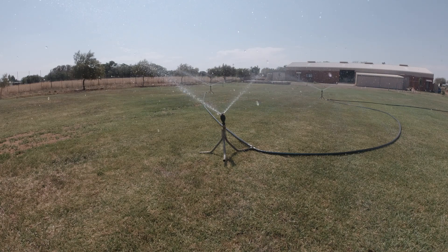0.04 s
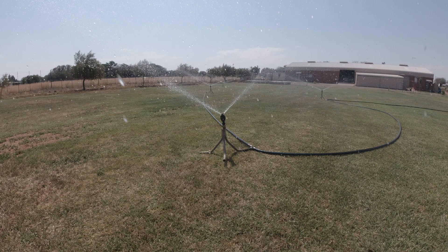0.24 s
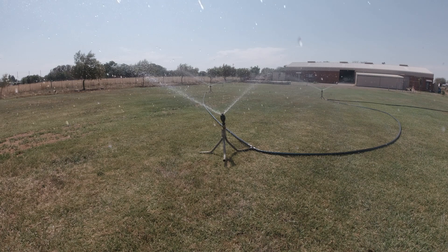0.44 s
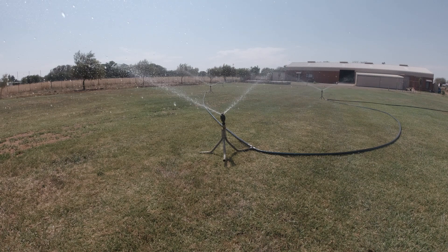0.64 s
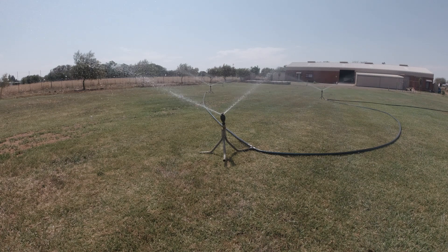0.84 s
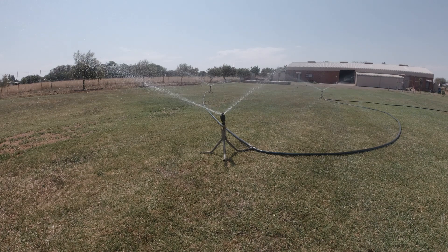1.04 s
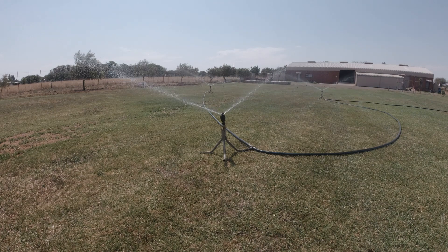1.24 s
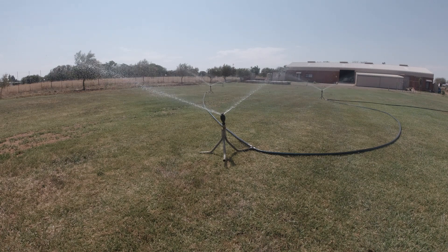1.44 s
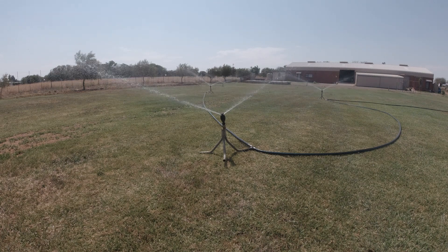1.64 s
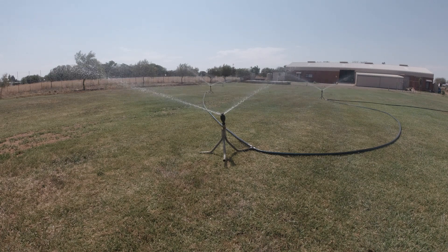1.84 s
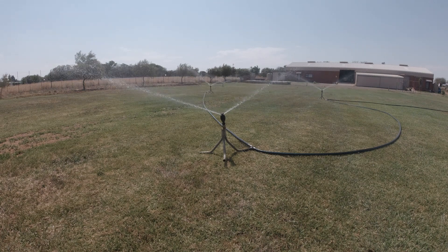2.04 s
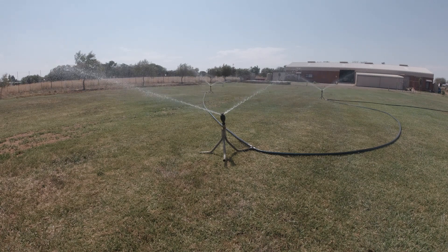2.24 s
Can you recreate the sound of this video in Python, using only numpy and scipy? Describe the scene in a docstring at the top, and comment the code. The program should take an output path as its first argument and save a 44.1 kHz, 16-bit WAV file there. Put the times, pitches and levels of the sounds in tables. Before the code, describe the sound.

A lawn sprinkler a few metres away hisses faintly throughout. From 0 to 0.65 s, drops tick crisply on the camera case, the hardest with hollow knocks near 0.17, 0.45 and 0.6 s, amid fine patter, fizz and low fluttering wind. It calms around 0.75 s; then the arm ticks fast and faint, about sixteen times a second, to the end. Wind buffets again from 1.2 s, easing after 1.9 s.

```python
"""A lawn sprinkler a few metres from a small camera in gusty wind; its jets hiss faintly all the way through.
First the edge of the jet sweeps over: drops tick on the plastic case and ring its hollow body, fine spray
patters and fizzes, and wind buffets both microphone ports. Then the spray moves on and the air calms.
From about 0.8 s the spring arm ticks quickly and faintly, and from about 1.2 s the wind gusts again.
Drops and arm are fading tones with noise, jets and spray are mostly shaped noise, wind is noise and low pulses."""
import sys
import numpy as np
from scipy import signal
from scipy.io import wavfile
from scipy.ndimage import uniform_filter1d, map_coordinates

SR = 44100
rng = np.random.default_rng(int(sys.argv[2]) if len(sys.argv) > 2 else 0)


def store_wav(level_fs):
    """Save 16-bit WAV to argv[1]."""
    pcm = np.round(np.clip(np.atleast_2d(level_fs), -1, 1) * 32767)
    wavfile.write(sys.argv[1], SR, pcm.T.astype(np.int16))


def linear_from_db(decibels):
    """Turn decibels (scalar or array-like) into linear amplitude factors; 0 gives 1."""
    return 10 ** (np.asarray(decibels, float) / 20)


N = 101429  # length in samples
LEFT_RIGHT = np.array([[1], [-1]])

# wind at the ports: (t/s, buffet level/dB, flutter level/dB, air speed/ratio to the mean), before trims
WIND_COURSE = [(0.0, -38, -89, 1.6), (0.02, -42, -71, 0.61), (0.14, -37.5, -55, 3.9), (0.16, -28.5, -52, 5),
               (0.22, -28, -49, 2.1), (0.24, -31, -31, 1.08), (0.3, -21, -27, 1.77),
               (0.34, -27, -33.5, 1.67), (0.4, -23, -23.5, 2), (0.43, -28.5, -40.5, 1.4),
               (0.49, -26, -32.5, 1.53), (0.5, -18.5, -46, 1.6), (0.52, -23, -33, 1.24),
               (0.57, -35, -58, 3.3), (0.61, -34.5, -55, 0.75), (0.67, -29, -40, 1.12),
               (0.695, -30.5, -42.5, 0.99), (0.76, -40.5, -64, 1.25), (0.82, -45, -50, 0.81),
               (0.86, -35, -63, 0.9), (0.88, -43.5, -76, 1.1), (1.0, -38.5, -55, 1.05),
               (1.04, -37.5, -56, 0.99), (1.06, -41, -66, 1.22), (1.16, -33.5, -35, 0.86),
               (1.18, -45, -34, 0.91), (1.21, -26.5, -34, 1.06), (1.23, -37, -21.5, 0.82),
               (1.3, -31, -27, 0.91), (1.34, -30.5, -24, 0.98), (1.38, -21.5, -33, 0.78),
               (1.45, -37.5, -26, 0.92), (1.5, -48, -41.5, 0.93), (1.52, -38, -33, 0.62),
               (1.6, -42, -44, 1.35), (1.64, -38, -36.5, 1.45), (1.67, -39, -35.5, 1.9),
               (1.71, -34, -26, 1.2), (1.75, -24.5, -34, 1.16), (1.78, -39, -38, 0.54),
               (1.81, -34, -35.5, 0.55), (1.86, -38, -38.5, 1.19), (1.9, -29, -35, 1.05),
               (1.94, -56.5, -33.5, 0.91), (2.26, -36, -48.5, 0.68), (2.3, -44, -45.5, 0.97)]
# how alike the wind is at the left and right ports: (f/Hz, likeness from -1 to 1)
WIND_LIKENESS = [(30, -0.062), (80, -0.25), (200, 0.32), (320, -0.036), (700, 0.49), (1500, 0.48)]
# fine spray on the case and at the ports: (t/s, patter level/dB, fizz level/dB), before trims
SPRAY_COURSE = [(0.0, -55, -60), (0.03, -62, -89), (0.054, -58, -92), (0.06, -65.5, -71), (0.146, -60, -69),
                (0.164, -61, -96), (0.172, -66, -76), (0.24, -60.5, -68), (0.352, -60, -88),
                (0.386, -50.5, -69), (0.436, -61, -60), (0.446, -48, -55), (0.498, -67, -64),
                (0.518, -57, -54), (0.526, -55.5, -62), (0.628, -58, -62.5), (0.658, -72, -70),
                (0.846, -75.5, -87), (0.854, -81, -77), (0.9, -74.5, -91)]


def unit(x):
    """Scale to rms 1."""
    return x / np.sqrt(np.mean(x ** 2) + 1e-20)


def along(points, hz):
    """Read (frequency, value) points on a log axis."""
    f, v = np.transpose(points)
    return np.interp(np.log(hz + 1), np.log(f + 1), v)


def curves(rows, t):
    """Read each column after the time, at times t."""
    s, *cols = np.transpose(rows)
    return [np.interp(t, s, c) for c in cols]


def wobble(rate):
    """A smooth random curve with this many random points a second."""
    return map_coordinates(rng.standard_normal(500), [np.arange(N) * rate / SR])


def lumps(depth_db, rate):
    """Quick swells of gain, partly shared by the two ports."""
    shared = wobble(rate)
    return unit(linear_from_db(depth_db * np.array([0.4 * shared + 0.6 * wobble(rate) for _ in "LR"])))


def band(x, lo_hz, hi_hz):
    """Keep a band of frequencies, with steep edges."""
    return signal.sosfilt(signal.butter(3, [lo_hz, hi_hz], "band", fs=SR, output="sos"), x)


def rush(spectrum, alike, patchy_db, moving_db=lambda hz, t: 0):
    """Stereo noise with patches of random gain, about rms 1 before the patches and the moving gain."""
    hz, t, z = signal.stft(rng.standard_normal((2, N + 2048)), SR, nperseg=1024, noverlap=768)
    hz = hz[:, None]
    field = uniform_filter1d(rng.standard_normal(z.shape[1:]), size=5, axis=0)
    field = uniform_filter1d(field, size=6, axis=1)
    inside = (hz > spectrum[0][0]) & (hz < spectrum[-1][0])
    shape = np.where(inside, linear_from_db(along(spectrum, hz)), 0)
    gain = shape / np.sqrt(np.mean(shape ** 2)) * linear_from_db(patchy_db * unit(field) + moving_db(hz, t))
    # more side against mid makes the two ports less alike
    turn = np.arccos(np.clip(along(alike, hz), -1, 1)) / 2
    mid, side = z[0] * np.cos(turn) * gain, z[1] * np.sin(turn) * gain
    return signal.istft(np.array([mid + side, mid - side]), SR, nperseg=1024, noverlap=768)[1][:, :N]


def add(out, s, sound):
    """Mix a sound in at time s."""
    i = round(s * SR)
    out[:, i:i + sound.shape[-1]] += sound[..., :N - i]


def ring(modes, t, scatter_db):
    """One blow on a set of modes: fading sine tones, each struck a little harder or softer by chance."""
    total = 0
    for hz, db, t60 in modes:
        level_db = db + scatter_db * rng.standard_normal()
        total = total + linear_from_db(level_db - 60 * t / t60) * np.sin(2 * np.pi * hz * t)
    return total


def swell(t, peak_s):
    """A smooth pulse that reaches 1 at peak_s and then dies away."""
    return (t / peak_s * np.exp(1 - t / peak_s)) ** 2


def jet_hiss():
    """The far jets hiss steadily: shaped noise with a slight waver."""
    # spectrum of the jets: (f/Hz, level/dB per Hz), relative
    jet_spectrum = [(290, -32.5), (500, -8.5), (720, -14), (1200, -17), (1470, -19), (2880, -25),
                    (6060, -30.5), (7220, -38.5), (8850, -25.5), (12700, -34), (14300, -28), (15600, -35.5),
                    (16300, -45.5)]
    # left-right likeness: (f/Hz, likeness from -1 to 1)
    jet_likeness = [(1000, 0.12), (4400, 0.047), (8000, 0.73), (15000, 0.64)]
    level_db = -66.5
    return linear_from_db(level_db + 0.9 * wobble(35)) * rush(jet_spectrum, jet_likeness, 0.58)


def spring_arm():
    """The arm ticks against the stream: each strike rings its modes and adds a crack of noise."""
    # strikes: (t/s, peak level/dB before trim)
    strikes = [(0.7887, -54.5), (0.856, -52), (0.9186, -54.5), (0.9897, -55), (1.048, -54.5), (1.1065, -56),
               (1.1694, -60), (1.224, -55), (1.29, -79), (1.354, -49), (1.3957, -62), (1.4375, -54),
               (1.504, -49), (1.525, -61), (1.5678, -51), (1.6227, -64), (1.684, -54), (1.738, -57),
               (1.7975, -55), (1.829, -57.5), (1.851, -54.5), (1.9106, -56), (1.9694, -65), (2.024, -56),
               (2.045, -50.5), (2.057, -61), (2.139, -56.5), (2.177, -60), (2.198, -59), (2.2553, -56)]
    # modes of the arm: (f/Hz, level/dB relative, time to fall 60 dB/s)
    arm_modes = [(2180, 1.5, 0.011), (2900, -6, 0.021), (4010, -4.5, 0.009), (5000, -4.5, 0.0073),
                 (8980, -6.5, 0.012)]
    crack_gain, trim_db = 2.5, -2.5
    out, t = np.zeros((2, N)), np.arange(SR // 20) / SR
    for s, db in strikes:
        noise = band(rng.standard_normal(len(t)), 1300, 6000)
        crack = crack_gain * linear_from_db(-60 * t / 0.0042) * noise
        blow = (ring(arm_modes, t, 4) + crack) * (1 - np.exp(-t / 0.0005))
        add(out, s, linear_from_db(db + trim_db) * blow[None] / abs(blow).max())
    return out


def whistles():
    """Thin wavering tones with soft ends, each a very narrow band of noise."""
    # whistles: (t/s, length/s, f/Hz, level/dB before the soft ends)
    thin_tones = [(.645, .035, 4950, -77), (.755, .085, 2900, -75), (1.89, .14, 2880, -79)]
    out = np.zeros((2, N))
    for s, length, hz, db in thin_tones:
        t = np.arange(round(length * SR)) / SR
        # take the end of the noise, where the filter has settled
        tone = unit(band(rng.standard_normal(SR // 4), hz - 60, hz + 60)[-len(t):])
        add(out, s, linear_from_db(db) * np.sqrt(np.sin(np.pi * t / length)) * tone[None])
    return out


def wind_buffet():
    """Slow wind pressure at the ports: low noise that follows the gusts."""
    # spectrum of the buffet: (f/Hz, level/dB per Hz), relative
    buffet_spectrum = [(15, -10), (30, 6), (60, -5), (120, -6), (200, -13), (400, -29), (700, -77)]
    low_noise = rush(buffet_spectrum, WIND_LIKENESS, 2.9, lambda hz, t: curves(WIND_COURSE, t)[0] + 0.77)
    return low_noise * lumps(2.5, 25)


def wind_eddies():
    """Eddies flutter at the ports: noise whose centre rises in pitch with the air speed."""
    # flutter spectrum: (f/ratio to the centre, level/dB relative)
    flutter_shape = [(.2, -15.5), (.5, 5.5), (1.05, -1.5), (1.8, -8), (3, -23.5), (4.5, -39.5), (6.5, -55),
                     (9, -68), (16, -100)]
    centre_hz = 305  # at mean air speed

    def eddies_db(hz, t):
        _, level_db, speed = curves(WIND_COURSE, t)
        ratio = hz / (centre_hz * np.clip(speed, 0.3, 4))
        # ratios are read as per cent, to suit the log axis
        shape_db = along([(100 * r, db) for r, db in flutter_shape], 100 * ratio)
        return level_db + shape_db - 10 * np.log10(np.mean(linear_from_db(2 * shape_db), 0))

    return rush([(10, 0), (SR / 2, 0)], WIND_LIKENESS, 2.17, eddies_db) * lumps(4, 70)


def wind_flaps():
    """The sharpest flaps of air: short low pulses with some rasp and a drifting phase at each port."""
    # flaps: (t/s, level/dB before trim, f/Hz before drift, rasp level/dB relative to the tone's peak)
    flaps = [(0.271, -26, 290, -15), (0.292, -16.5, 520, -17), (0.315, -16.5, 390, -10.5),
             (0.349, -15.5, 385, -20), (0.377, -21.5, 347, -7), (0.393, -14, 507, -18),
             (0.398, -10.5, 325, -18), (0.479, -21, 700, -25), (0.511, -32, 358, -13),
             (0.672, -27, 536, -28), (1.227, -20, 373, -38), (1.237, -20, 490, -41),
             (1.289, -20.5, 360, -36), (1.326, -12, 350, -38), (1.33, -20.5, 590, -33),
             (1.387, -25, 393, -38), (1.443, -15, 279, -31), (1.619, -27.5, 496, -20),
             (1.669, -19.5, 610, -40), (1.686, -21.5, 480, -23), (1.713, -15, 260, -39),
             (1.732, -18.5, 242, -34), (1.878, -25, 450, -24), (1.97, -19.5, 283, -35),
             (2.038, -29.5, 378, -32.5)]
    cycles_to_peak, trim_db = 1.06, -5.5
    out, t = np.zeros((2, N)), np.arange(SR // 20) / SR
    for s, db, hz, rasp_db in flaps:
        drift = 0.52 * rng.standard_normal((2, 1)) + 150 * t * rng.standard_normal((2, 1))
        rasp = linear_from_db(rasp_db) * unit(band(rng.standard_normal((2, len(t))), 800, 1660))
        tone = np.sin(2 * np.pi * hz * t + drift)
        add(out, s, linear_from_db(db + trim_db) * swell(t, cycles_to_peak / hz) * (tone + rasp))
    return out


def wind_shoves():
    """The heaviest low shoves: a push and rebound of pressure, reaching each port in its own phase."""
    # shoves: (t/s, level/dB, f/Hz, left over right/dB)
    air_shoves = [(0.138, -21.5, 78.5, 6), (0.189, -16, 44.5, 1), (0.274, -17.5, 184, 3),
                  (0.28, -20, 195, 0), (0.306, -19, 210, 2), (0.33, -20.5, 147, 3), (0.362, -20, 160, 0),
                  (0.369, -24.5, 187, -9), (0.412, -38, 89, 9), (0.461, -31, 44.8, 0.5),
                  (0.54, -25.5, 61, -7), (0.64, -27.5, 183, -6), (0.656, -23, 43, 3),
                  (0.665, -21.5, 193, -1), (0.672, -23, 240, 3), (0.674, -27, 50.4, -7),
                  (0.7, -27.5, 46.6, 2), (1.283, -17.5, 89, 0), (1.314, -13.5, 67, 1.5),
                  (1.358, -23, 58.7, -2), (1.398, -19, 135, 2), (1.709, -25, 63.6, 3),
                  (1.738, -24.5, 207, 14)]
    cycles_to_peak = 0.43
    out, t = np.zeros((2, N)), np.arange(SR // 8) / SR
    for s, db, hz, pan_db in air_shoves:
        wave = np.sin(2 * np.pi * hz * t + 0.79 * rng.standard_normal((2, 1)))
        add(out, s, linear_from_db(db + pan_db / 2 * LEFT_RIGHT) * swell(t, cycles_to_peak / hz) * wave)
    return out


def narrow_fizz():
    """Early spray fizz at the port resonance: wavering noise in a narrow band."""
    # course of the narrow fizz: (t/s, level/dB before the waver)
    narrow_fizz_course = [(0.17, -95), (0.185, -70), (0.25, -64.5), (0.32, -79), (0.4, -69), (0.44, -95)]
    # its spectrum: (f/Hz, level/dB per Hz), relative
    narrow_fizz_spectrum = [(8300, -17), (8900, -1.5), (9300, -4), (9700, -20)]
    narrow_fizz_db, = curves(narrow_fizz_course, np.arange(N) / SR)
    return linear_from_db(narrow_fizz_db + 3.6 * wobble(100)) * rush(narrow_fizz_spectrum, [(9000, 0.28)], 1.5)


def spray_levels():
    """Patter and fizz levels, faded far down by 1.05 s."""
    return curves(SPRAY_COURSE + [(1.05, -100, -100)], np.arange(N) / SR)


def spray_fizz():
    """Fine spray fizzes at the ports while the jet's edge is near: wavering treble noise."""
    # spectrum of the fizz: (f/Hz, level/dB per Hz), relative
    fizz_spectrum = [(6500, -20), (8200, -9), (9200, -1), (10000, -8), (11000, -7), (12500, -30)]
    fizz_db = spray_levels()[1]
    return linear_from_db(fizz_db - 7.0 + 0.88 * wobble(60)) * rush(fizz_spectrum, [(9000, 0.32)], 2)


def spray_patter():
    """Fine droplets patter on the case: many tiny fading tones of random time, pitch, size and side."""
    per_s, middle_hz, pitch_spread, size_db, trim_db = 2800, 2620, 0.41, 2.5, 3
    draw = rng.random((5000, 4))
    start = np.cumsum(-np.log(draw[:, 0])) / per_s
    draw, start = draw[start < 1.05], start[start < 1.05]
    hz = middle_hz * np.exp(pitch_spread * np.log(draw[:, 1:2] / (1 - draw[:, 1:2])) / 1.57)
    t = np.arange(200) / SR
    # each tone falls 60 dB in 10 cycles
    level_db = -size_db * np.log(draw[:, 2:3] + 0.011) - 60 * t * hz / 10.0
    rise = 1 - np.exp(-t / 0.00025)
    grain = linear_from_db(level_db) * rise * np.sin(2 * np.pi * np.minimum(hz, 9000) * t)
    where = (start[:, None] * SR).astype(int) + np.arange(200)
    side = np.pi * (draw[:, 3:4] - 0.25)
    pair = np.array([np.bincount(where.ravel(), (grain * g).ravel(), N) for g in (np.cos(side), np.sin(side))])
    even = pair / np.sqrt(np.mean(pair[:, :SR] ** 2))  # rms 1 over the first second
    return even * linear_from_db(spray_levels()[0] + trim_db)


def drop_thuds():
    """Heavy drops ring the hollow body: its modes sound with a soft start."""
    # heavy drops: (t/s, level/dB before trim)
    heavy_drops = [(0.096, -38), (0.132, -44), (0.146, -34.5), (0.169, -19), (0.252, -32), (0.4498, -20),
                   (0.48, -35.5), (0.523, -41), (0.552, -38.5), (0.582, -26), (0.602, -36), (0.615, -41)]
    # modes of the body: (f/Hz, level/dB relative, time to fall 60 dB/s)
    body_modes = [(929, -1, 0.045), (843, -29, 0.034), (1490, 2.5, 0.0051)]
    out, t = np.zeros((2, N)), np.arange(SR // 10) / SR
    soft_start = 1 - np.exp(-t / 0.0013)
    for s, db in heavy_drops:
        add(out, s, linear_from_db(db + 0.5) * soft_start * ring(body_modes, t, 0.4)[None])
    return out


def drop_snaps():
    """Some drops also snap: very short bursts of noise, some up to the top of the treble."""
    # snaps: (t/s, level/dB before halving, centre f/Hz, left over right/dB)
    snaps = [(0.1465, -54, 4470, -1), (0.1762, -48.5, 14600, 10), (0.1762, -51, 5360, 10),
             (0.377, -55, 14000, 0), (0.4, -56, 13100, -1), (0.448, -53, 13500, 5), (0.515, -52, 14100, 1),
             (0.551, -59, 5430, 0), (0.6014, -45.5, 5360, 11), (0.615, -51, 5500, 4)]
    rise_s = 0.0007
    out, t = np.zeros((2, N)), np.arange(SR // 10) / SR
    pulse = t / rise_s * np.exp(1 - t / rise_s)
    for s, db, hz, pan_db in snaps:
        noise = unit(band(rng.standard_normal(len(t)), 0.52 * hz, min(1.13 * hz, 16300)))
        add(out, s, linear_from_db(db + pan_db / 2 * LEFT_RIGHT) * pulse * noise / 2)
    return out


def drop_ticks():
    """Each drop on the case is a short pitched tick with case modes, a crack, spatter and a treble spit."""
    # drops: (t/s, tick level/dB before trim, f/Hz, spit level/dB before trim, left port leads by/microseconds)
    tick_drops = [(0.0083, -36, 2560, -64, 70.0), (0.0248, -47, 2620, -67, 20.0),
                  (0.0341, -36, 2730, -62, 100.0), (0.0459, -40, 2430, -67, 20.0),
                  (0.0573, -44, 3290, -67, 130.0), (0.0966, -38, 2230, -67, 150.0),
                  (0.1466, -22, 2400, -67, -50.0), (0.1697, -28, 3900, -60, -70.0),
                  (0.1761, -21, 3650, -56, -70.0), (0.1986, -40, 3130, -58, -40.0),
                  (0.2239, -41, 2880, -58, 70.0), (0.2804, -37, 2170, -64, 120.0),
                  (0.3204, -39, 2160, -56, 210.0), (0.3635, -36, 2550, -61, -20.0),
                  (0.3773, -28, 1920, -58, 110.0), (0.3812, -31, 2120, -50, -60.0),
                  (0.401, -36, 2670, -46, -90.0), (0.4488, -26, 2740, -38, 120.0),
                  (0.4618, -37, 2830, -50, 120.0), (0.4698, -43, 2530, -52, 30.0),
                  (0.5052, -46, 2280, -53, -30.0), (0.5163, -39, 2850, -42, -110.0),
                  (0.5269, -36, 2240, -60, 50.0), (0.5305, -36, 2590, -61, 50.0),
                  (0.549, -25, 2800, -46, -40.0), (0.565, -42, 2380, -56, -20.0),
                  (0.5763, -47, 2780, -62, -30.0), (0.5815, -31, 2750, -58, 10.0),
                  (0.5933, -37, 2560, -60, 0.0), (0.6015, -24, 2600, -54, -30.0),
                  (0.6167, -34, 2220, -45, -40.0), (0.6308, -46, 2130, -58, -40.0),
                  (0.7558, -53, 2370, -70, -40.0)]
    # case modes every tick also rings: (f/Hz, level/dB relative, time to fall 60 dB/s)
    case_modes = [(1360, -9, 0.0075), (2570, -2.5, 0.0048), (3220, -21, 0.011), (3560, -19, 0.0049)]
    tick_cycles, rise_s, tick_trim_db, case_db = 10.5, 0.00045, 1.5, -9  # cycles to fall 60 dB
    crack_gain, splash_gain, splash_t60_s = 0.3, 0.018, 0.07  # splash: spatter that lingers
    spit_hz, spit_t60_s, spit_trim_db = 8830, 0.009, 2
    out, t = np.zeros((2, N)), np.arange(SR // 10) / SR
    rise = (1 - np.exp(-t / rise_s)) ** 2
    for s, db, hz, spit_db, lead_us in tick_drops:
        lead = lead_us / 2e6 * LEFT_RIGHT  # half the lead to each port, in seconds
        noise = rng.standard_normal((2, len(t)))
        fade = linear_from_db(-60 * t * hz / tick_cycles)
        tone = fade * np.sin(2 * np.pi * hz * (t + lead))
        case = linear_from_db(case_db) * ring(case_modes, t + lead, 1)
        noise_level = crack_gain * fade + splash_gain * linear_from_db(-60 * t / splash_t60_s)
        tick = tone + case + noise_level * unit(band(noise, 0.54 * hz, 1.18 * hz))
        tick = tick / abs(rise * tick).max()
        spit = unit(band(noise[::-1], 0.894 * spit_hz, 1.14 * spit_hz)) + 0.33 * band(noise, 8000, 15500)
        spit = linear_from_db(spit_db + spit_trim_db - 60 * t / spit_t60_s) * spit
        add(out, s, rise * (linear_from_db(db + tick_trim_db) * tick + spit))
    return out


def scene():
    """Everything at the two ports."""
    far = jet_hiss() + spring_arm() + whistles()
    wind = wind_buffet() + wind_eddies() + wind_flaps() + wind_shoves()
    spray = narrow_fizz() + spray_fizz() + spray_patter()
    drops = drop_thuds() + drop_snaps() + drop_ticks()
    return far + wind + spray + drops


def band_limit(x):
    """A steep low-pass at the top of the band."""
    return signal.sosfilt(signal.butter(12, 16000, fs=SR, output="sos"), x)


def record(dry):
    """The finished mix as the camera stores it."""
    return band_limit(dry)


dry = scene()
out = record(dry)
store_wav(out)
```